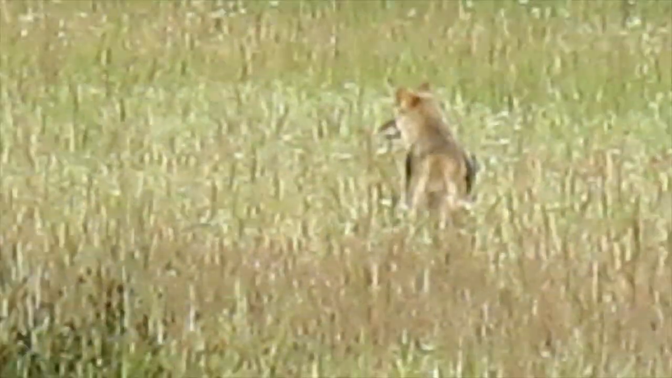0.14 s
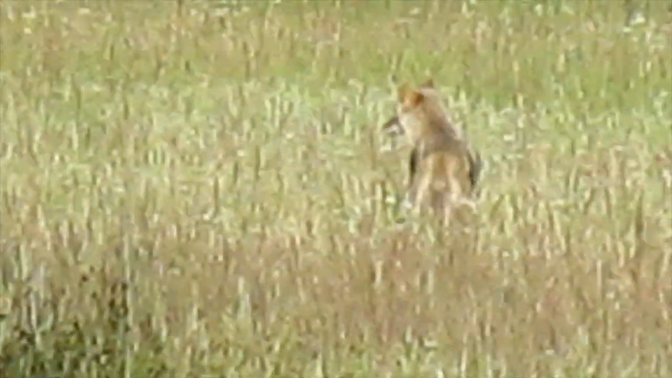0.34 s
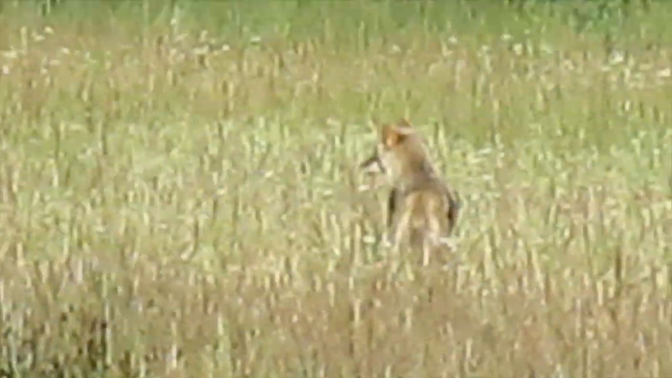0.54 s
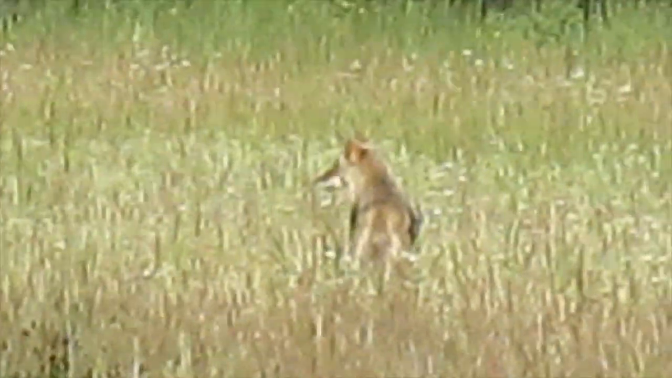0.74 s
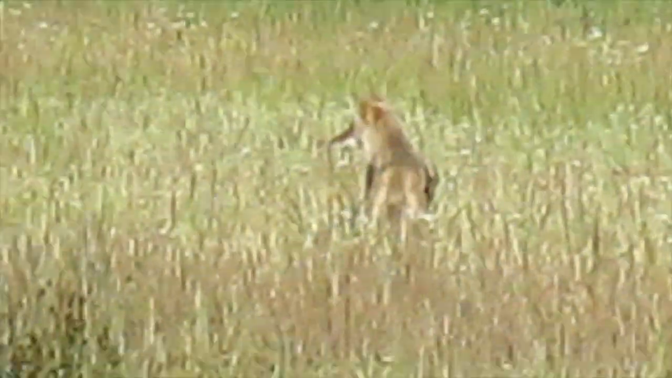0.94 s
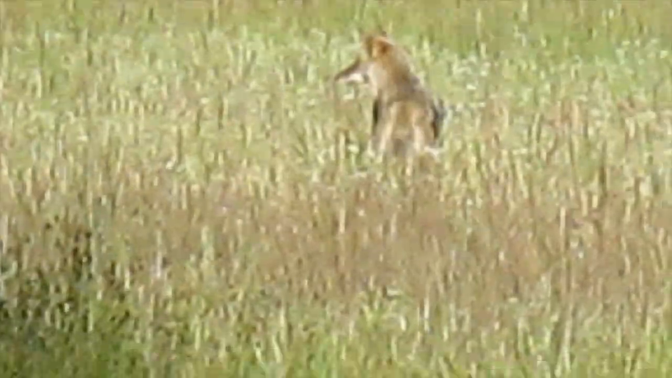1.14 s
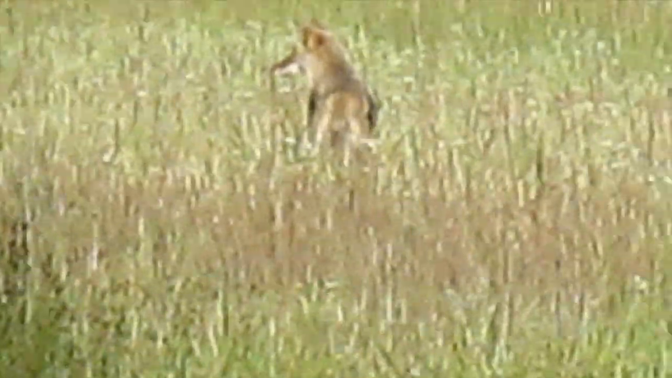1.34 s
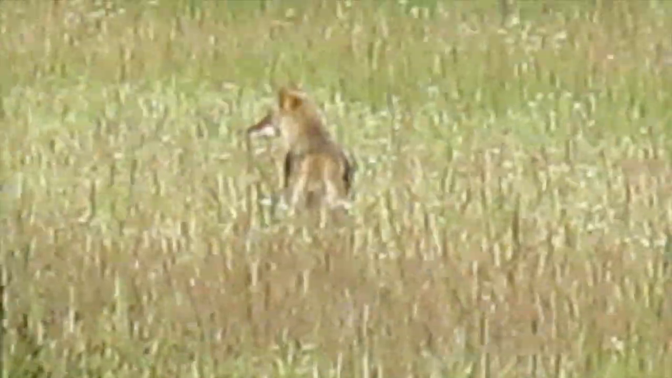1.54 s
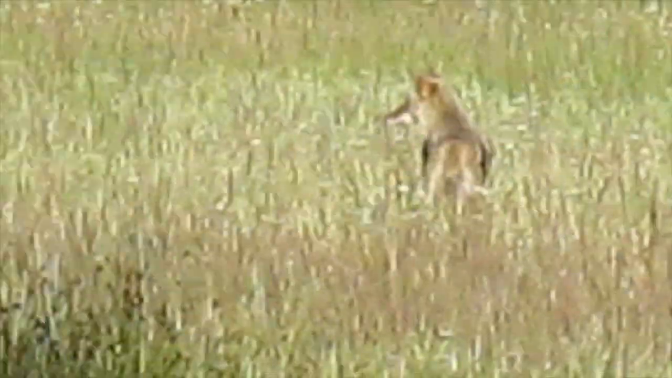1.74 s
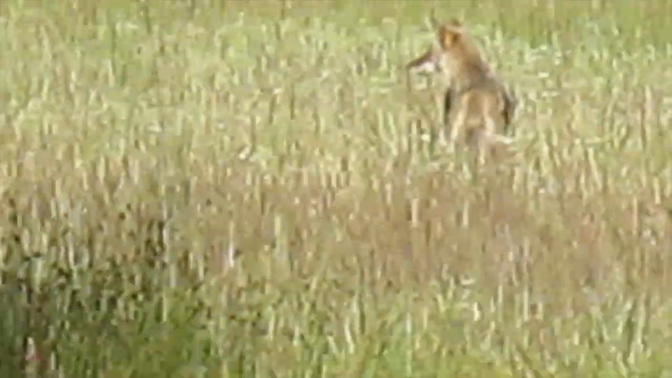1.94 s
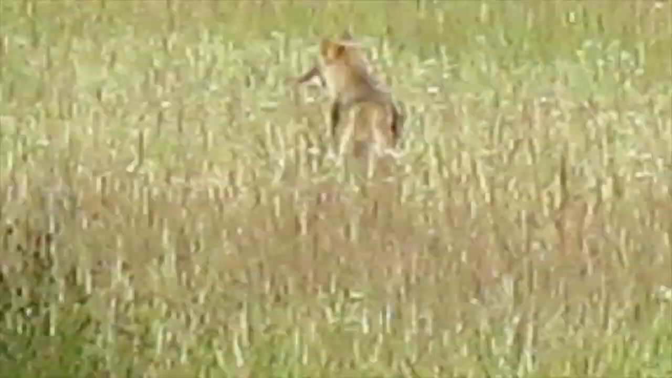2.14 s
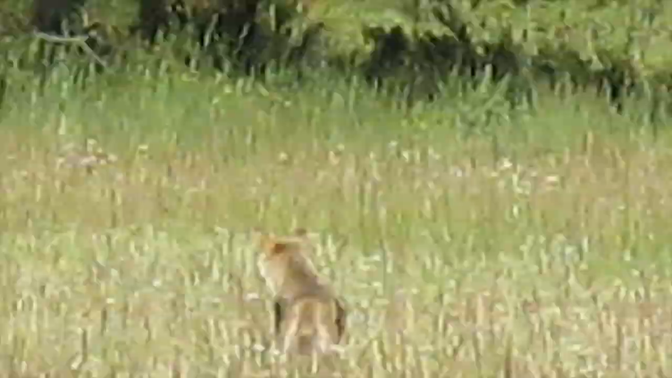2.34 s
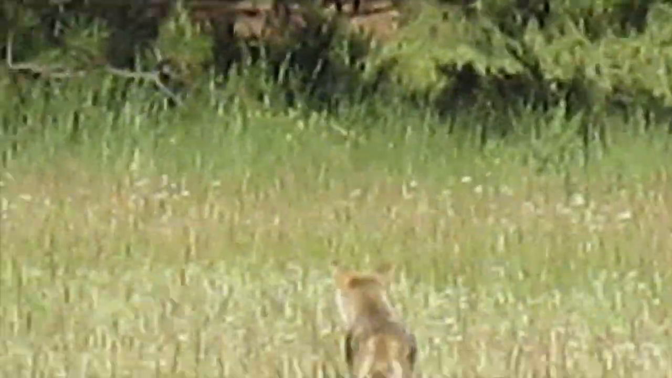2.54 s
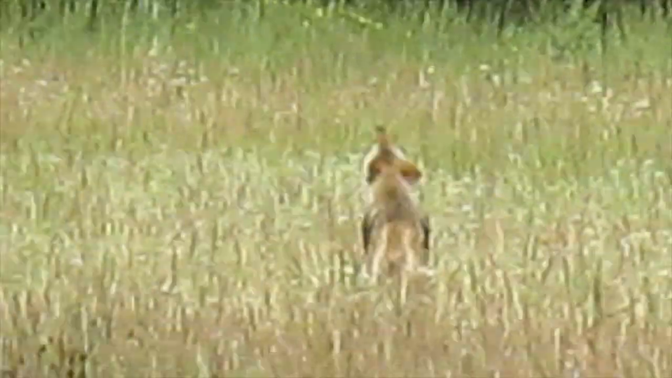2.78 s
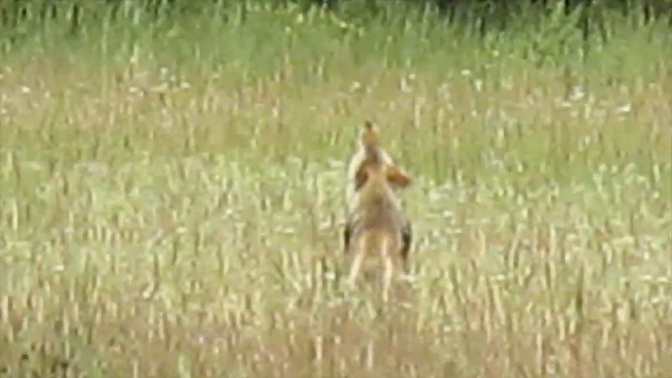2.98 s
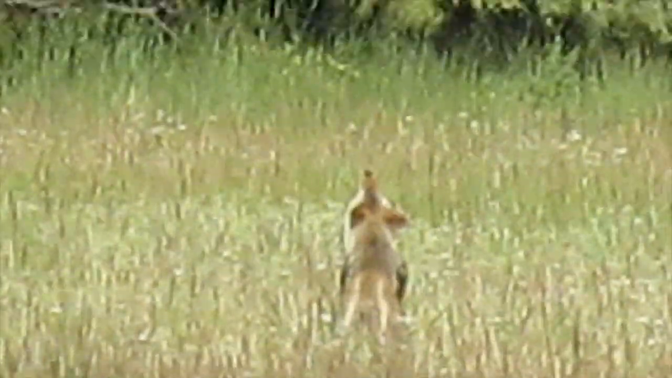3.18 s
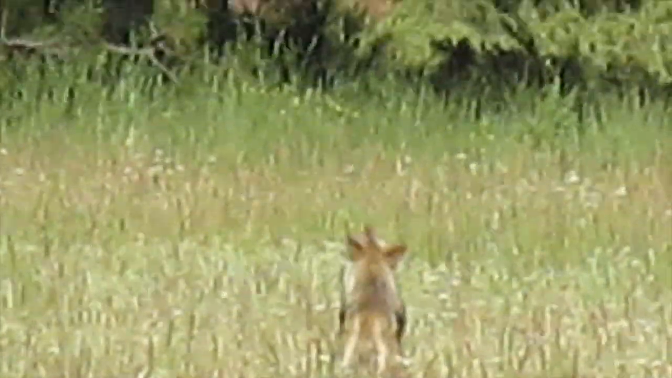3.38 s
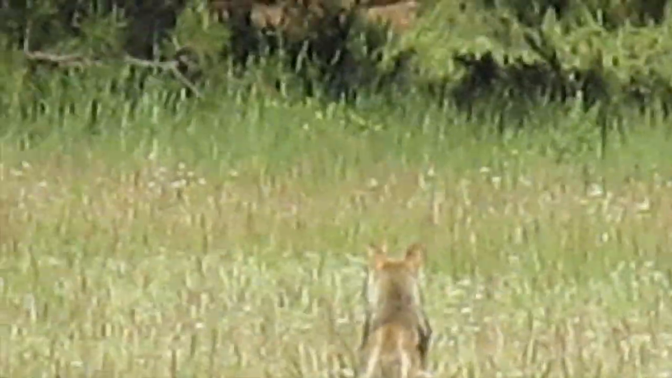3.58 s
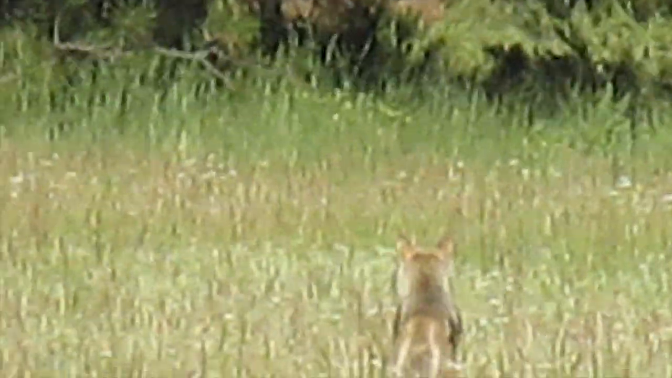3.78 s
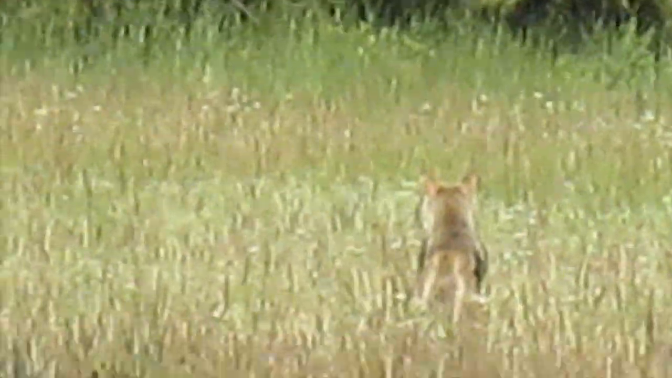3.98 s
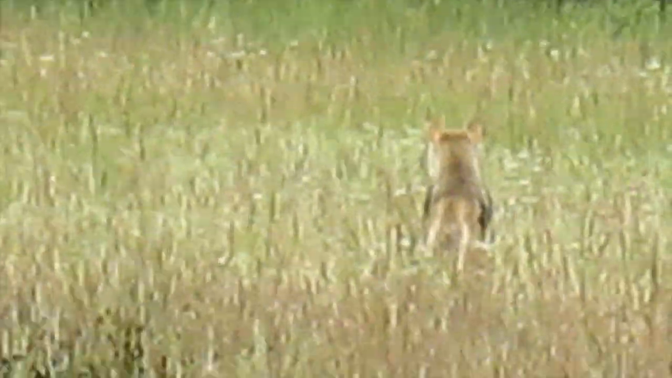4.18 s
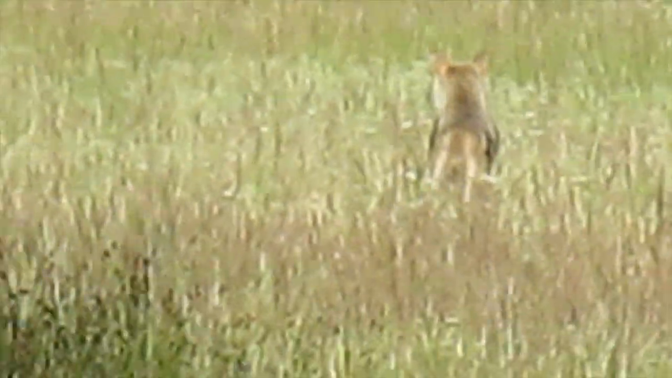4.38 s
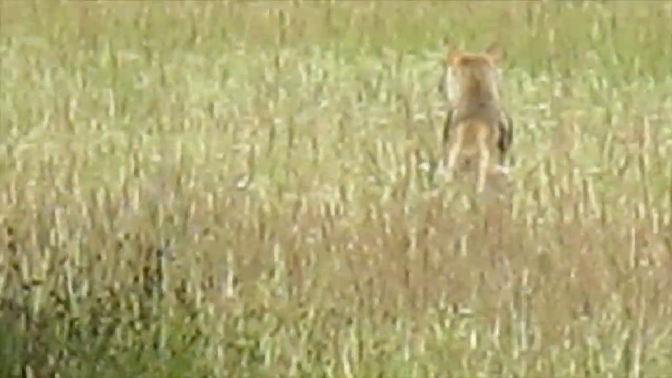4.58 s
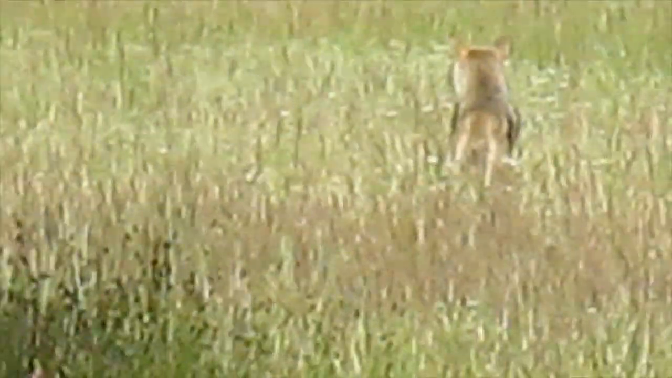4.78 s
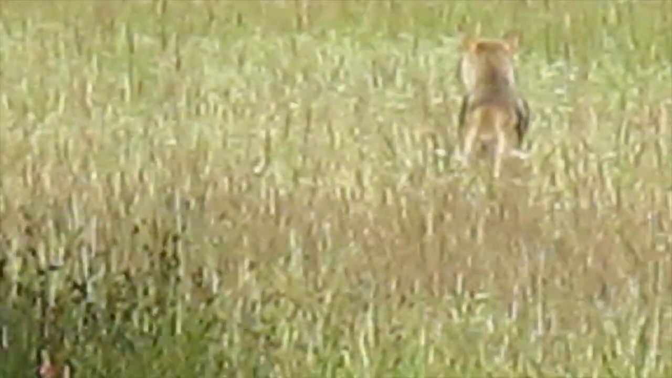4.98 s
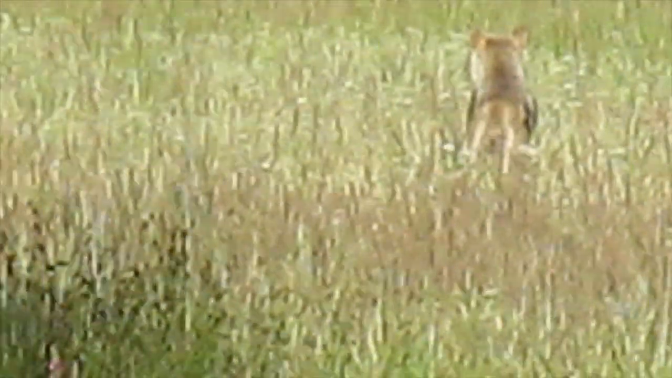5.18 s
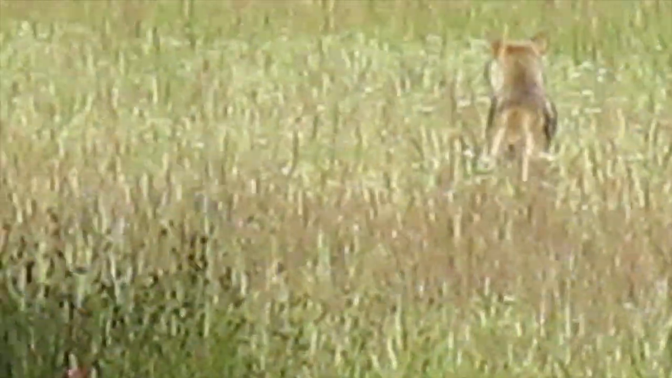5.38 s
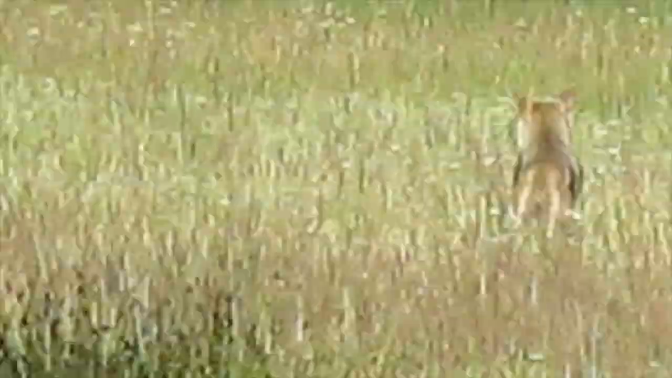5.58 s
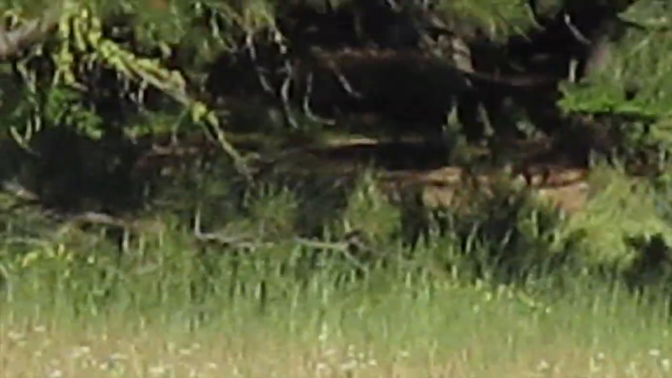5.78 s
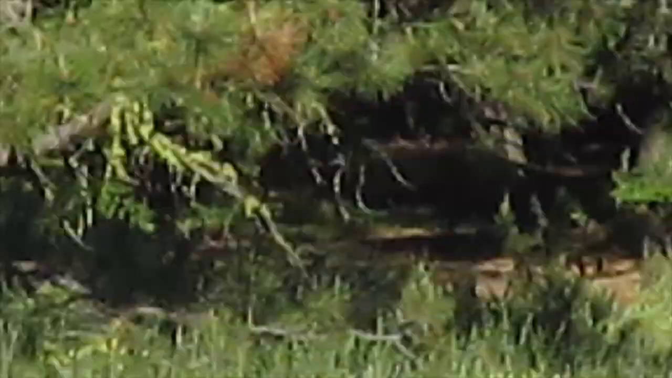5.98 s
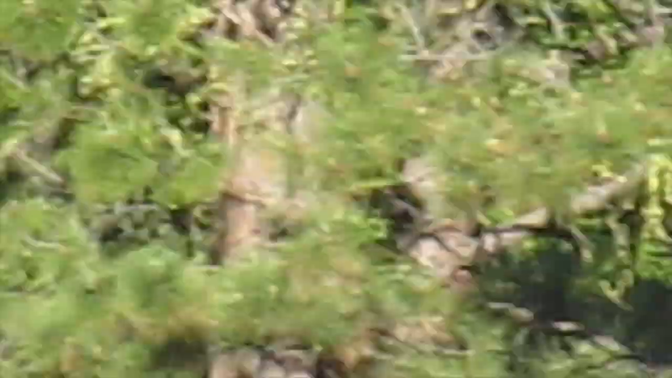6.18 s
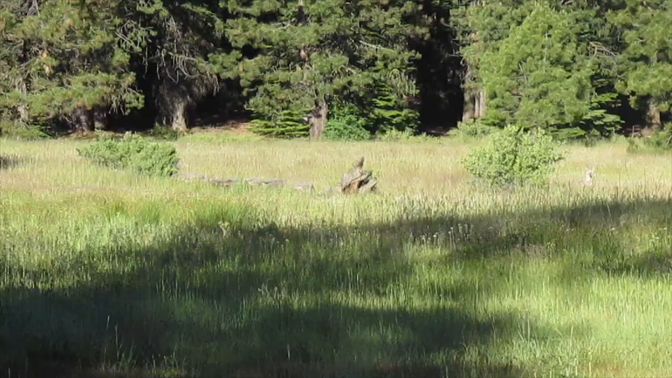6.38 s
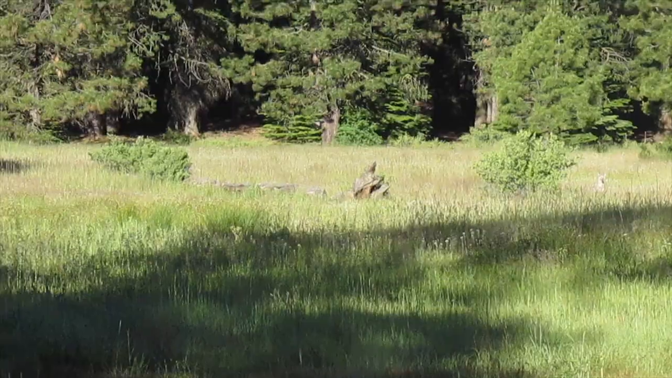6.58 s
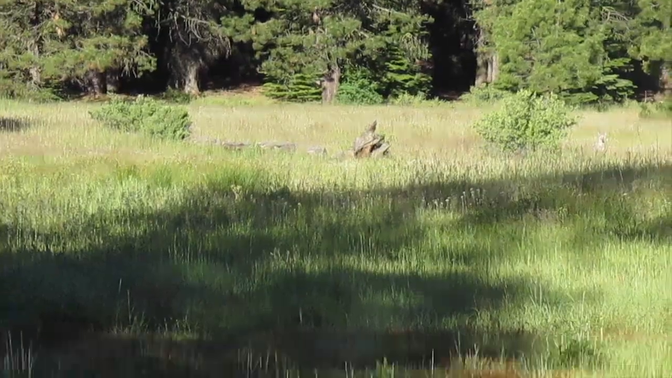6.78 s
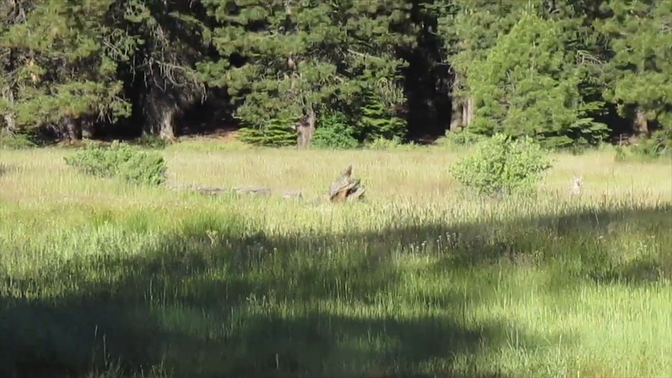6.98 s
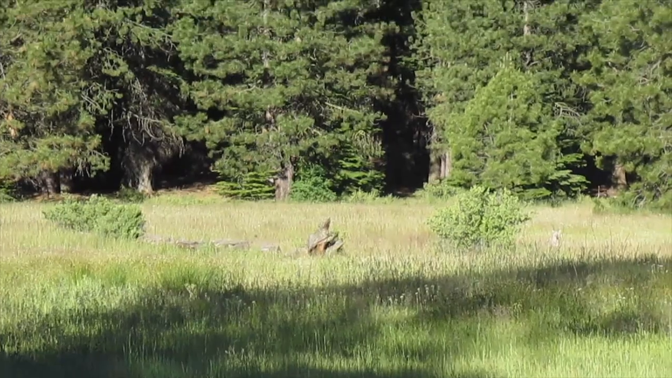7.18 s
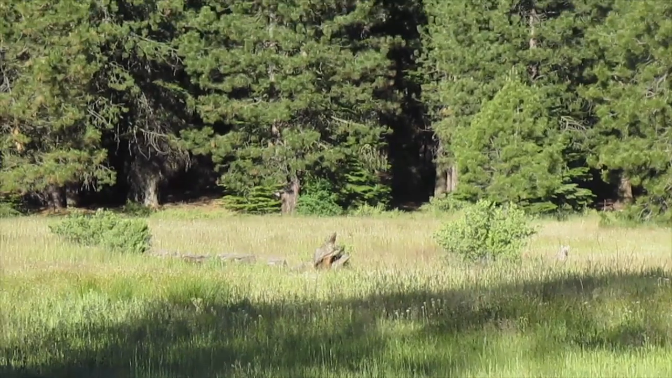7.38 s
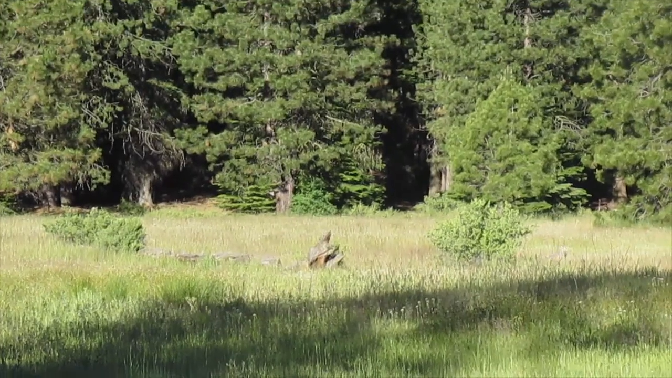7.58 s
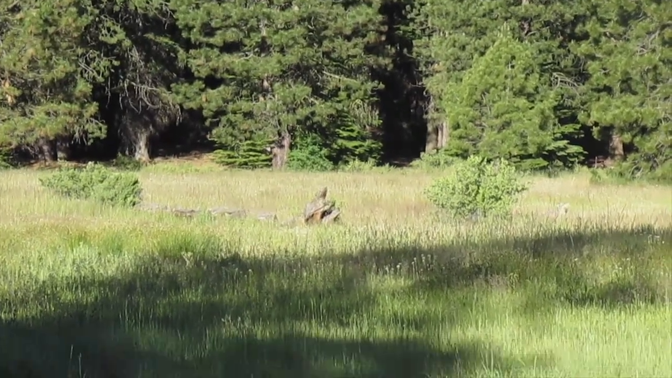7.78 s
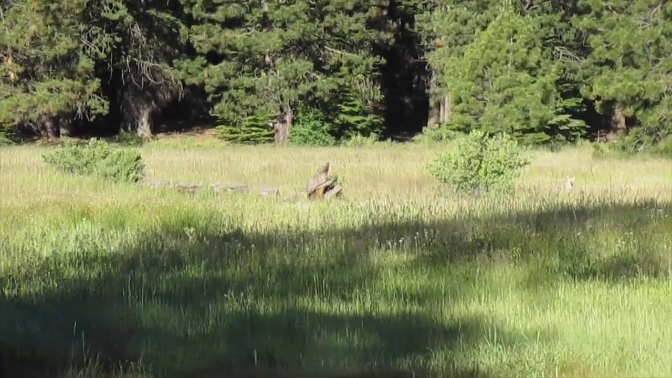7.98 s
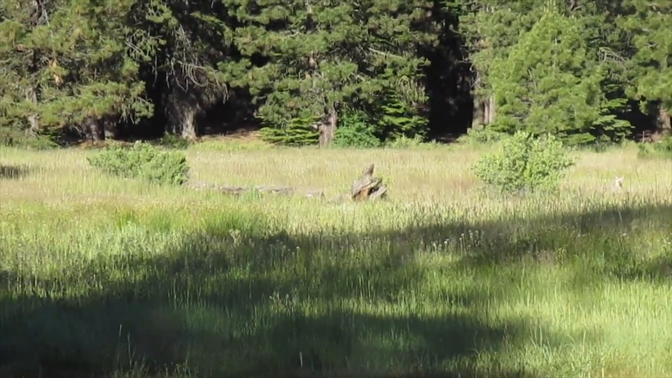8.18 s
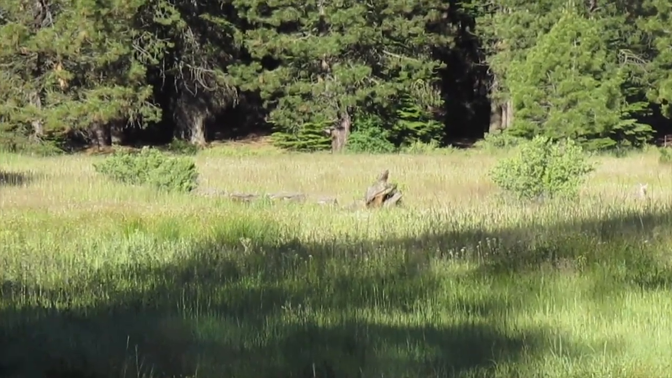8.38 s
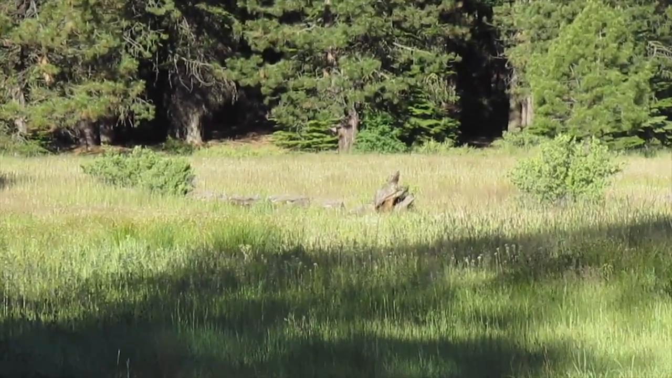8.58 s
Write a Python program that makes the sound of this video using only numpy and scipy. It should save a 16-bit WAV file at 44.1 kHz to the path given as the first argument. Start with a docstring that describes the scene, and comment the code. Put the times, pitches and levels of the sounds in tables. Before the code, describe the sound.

Soft breeze and microphone hiss fill a forest-edged meadow, with the fading echo of an earlier howl at the start. A bird gives short rising whistles about every half second, left of centre; rough two-toned chucks come from the left too. A series of thin arched chips runs on the right from 0.5 to about 1.9 seconds and again from 5.1. Warbling whistled phrases come between 2 and 4.8. At 3.0 a distant coyote scoops up, breaks into a high clear howl, sags, roughens slightly and drops by 3.8; its echo lingers for seconds. Tiny far pips follow. Fingers rub the camera near 5.5 and 5.7. Sound vanishes from 6.3 to 6.5, then returns quieter, without the echo, with faint whistles and sparse chucks, the breeze slowly rising. A light knock comes at 7.1, sharper knocks and rubbing from 8.2, and a cluster of taps with a rattling, buzzing zoom motor from 8.4 to the end.

```python
"""A coyote far out in a meadow howls, and the forest edge rings on for seconds, as it still does at the
start from an earlier howl. Nearby birds whistle, chip, chuck and sing; their notes are sines along drawn
curves. Behind them lie breeze and microphone hiss, made of shaped random noise, and faint steady tones.
The sound is cut, goes silent briefly and fades up as a second scene. Fingers knock and rub the body of a
hand-held camera and start its zoom motor: bursts, noise and gear clicks that ring through resonances."""
import sys
import numpy as np
from scipy import signal
from scipy.fft import rfft, irfft, next_fast_len
from scipy.io import wavfile
from scipy.ndimage import uniform_filter1d

SR = 44100
rng = np.random.default_rng(int(sys.argv[2]) if len(sys.argv) > 2 else 0)


def digitize_waveform(pressure):
    """Quantize a signal to 16-bit integers and store it at the path in sys.argv[1].

    Rows of a 2-D input are taken as channels; values are limited to [-1, 1].
    """
    field = np.atleast_2d(pressure).T
    bounded = np.clip(field, -1, 1)
    quanta = np.round(bounded * 32767).astype(np.int16)
    wavfile.write(sys.argv[1], SR, quanta)


N = 380566
TIME = np.arange(N) / SR
FFT_SIZE = next_fast_len(N)

# the silence between the two scenes: start t/s, end t/s
CUT_S = (6.318, 6.481)

# air noise colour: f/Hz, relative level/dB per Hz
AIR_COLOUR = [(12, -51), (20, -8), (74, -3), (171, -4.5), (220, -4), (353, -3.5), (792, -8), (1110, -6.5),
              (1420, -8.5), (1590, -10), (2410, -13), (4210, -13), (5720, -16), (6580, -15.5), (15600, -17)]
AIR_DB = -62.5  # overall, before the left-right spread and the swells
# how alike left and right air noise are: f/Hz, correlation (-1 to 1)
AIR_LIKENESS = [(60, -0.58), (130, -0.65), (290, -0.42), (640, 0.15), (1410, 0.06), (3100, -0.17),
                (6820, 0.06), (15000, 0.05)]
# tilt of the air noise between the ears: f/Hz, left minus right level/dB
AIR_LEAN = [(60, 0.5), (110, -1), (200, 1), (380, 1), (700, -0.5), (1290, 1), (2380, -1.0), (4400, 0),
            (8120, 1.5), (15000, -1)]
# slow background swell, lower after the cut and creeping back: t/s, level/dB, extra low wind level/dB
BACKGROUND_SWELL = [(0, -0.5, 0.5), (2, -0.5, 0.5), (4, -0.5, -0.5), (6.3, 0, 1.5), (6.479, -4.5, -3),
                    (6.8, -5.5, 0.5), (7.101, -3.5, -1.5), (7.4, -3, 0), (7.6, -2, 5.5), (7.9, 1, -2),
                    (8.201, 1, 2.5), (8.63, 0, -1)]
# short dips of the background: start t/s, end t/s, level/dB
BACKGROUND_DIPS = [(8.2, 8.205, -3), (8.402, 8.428, -10), (8.465, 8.47, -4)]
# faint steady tones: the highest from the camera electronics, those near 3.1 kHz probably far bird whistles
# columns: f/Hz, level/dB, start t/s, end t/s
STEADY_TONES = [(15734, -92, 0, 9), (6320, -84, 7.5, 8.2), (3170, -76, 6.48, 6.57), (3200, -80, 7.66, 7.75),
                (3080, -78, 7.76, 8.1)]
TONE_FLICKER_DB = 3

# echo by band: f/Hz, far trees' time to fall 60 dB t/s, their level/dB, near trees' time t/s, their level/dB
FOREST_BANDS = [(500, 7.0, 3.5, 0.81, -12.5), (975, 6.0, 2.5, 0.65, -1), (1500, 3.8, -2.5, 0.18, -7),
                (2500, 4.2, -7.5, 0.24, 2), (4000, 1.2, -16, 0.25, -5), (7000, 0.92, -16, 0.74, -1)]
# bunched echoes off walls of trees: delay t/s, spread t/s, level/dB
TREE_WALLS = [(.13, 0.034, -13), (.3, .05, -23)]
FAR_RISE_S, ECHO_PAN_DB = 0.34, 3  # the far slope lies to the left
PATCHY_DB = 3  # slopes and gaps make the long echo uneven
ECHO_SHARED = .1  # part of the echo that both ears hear alike, 0-1
# the earlier howl, heard only as echo: start t/s, relative level/dB
EARLIER_HOWL = (-1.6, -19.5)

# placing of each voice, by name: left minus right level/dB
VOICE_PAN = {"howl": -2, "whistle": -7, "chip": 8, "chuck": -6.5, "song": .1, "pip": 2}

# Note shapes: t/s from the note's time, f/Hz before any pitch scaling, level/dB added to the note's level
# rising whistle
WHISTLE_RISE = [(-.038, 1970, -22), (-.025, 2150, -9.5), (-.01, 2330, -3.5), (0, 2450, -6),
                (.008, 2530, -3.5), (.016, 2500, -23)]
# thin tick that opens the rising whistle
WHISTLE_TICK = [(-.028, 8400, -25), (-.022, 8750, -9), (-.014, 9000, -16.5), (-.01, 9000, -30)]
# weak octave of the rising whistle
WHISTLE_OCTAVE = [(-.032, 4150, -29), (-.024, 4300, -13.5), (-.012, 4400, -17.5), (.005, 4900, -20),
                  (.012, 5050, -33)]
# arched chip
CHIP_ARCH = [(-.03, 4900, -13), (-.018, 5405, -6), (0, 5785, 2.5), (.01, 5850, -8.5), (.022, 5500, -9),
             (.04, 4434, -4), (.046, 4230, -27)]
# lower voice of a chuck
CHUCK_LOWER = [(-.028, 1245, -23), (-.021, 1480, -5), (-.006, 1570, 0.5), (.004, 1500, -0.5),
               (.014, 1250, -2.5), (.026, 1050, -19.5)]
# upper voice of a chuck
CHUCK_UPPER = [(-.024, 2500, -28), (-.017, 2899, -10.5), (0, 2247, -6.5), (.015, 1650, -8.5),
               (.028, 1350, -26)]
# clean up-and-down flick before some song phrases
FLICK_SHAPE = [(-.008, 3200, -4), (0, 3750, 0), (.012, 3130, -3)]
# pip of a far bird
PIP_SHAPE = [(-.022, 4270, -13), (-.01, 4700, -0.5), (0, 4800, -3.5), (.012, 4500, -2), (.024, 4150, -18)]
# longer, level whistle of the far bird
HELD_SHAPE = [(0, 4080, -12), (.02, 4150, -3), (.05, 4280, 0), (.075, 4220, -2), (.09, 4200, -15)]

# rising whistles: t/s
WHISTLE_TIMES = [.218, .693, 1.226, 1.711, 2.231, 2.759, 3.18, 3.648, 4.16, 4.648, 5.182, 5.671, 6.128,
                 6.536, 6.939, 7.348, 7.727, 8.165]
WHISTLE_DB, WHISTLE_AFTER_CUT_DB = -57, -70
# chip series: first chip t/s, full level/dB
CHIP_SERIES = [(.485, -69), (5.11, -66.5)]
# number of chips in each series
CHIP_COUNTS = (12, 10)
CHIP_GAP_S, CHIP_SLOWING_S = .1221, .001  # starting gap, and its growth per chip
CHIP_START_DB, CHIP_SCATTER_DB = -9, 1.2
# two-voiced chucks: t/s, lower voice level/dB, pitch f/Hz, upper voice level/dB
CHUCK_CALLS = [(.515, -64, 1348, -65), (1.255, -60, 1413, -62), (1.486, -58, 1500, -61),
               (1.702, -58.5, 1672, -63), (1.931, -59, 1670, -62), (2.195, -60.5, 1584, -64),
               (5.11, -57, 1398, -59), (5.976, -58, 1500, -60), (6.263, -58, 1540, -60),
               (7.519, -71.5, 1367, -73), (7.784, -64.5, 1440, -69), (8.025, -62, 1518, -72),
               (8.252, -63, 1500, -66), (8.53, -66, 1463, -73)]

# phrases that warble, then slide clean: start t/s, slide t/s, end t/s,
# start f/Hz, f/Hz at the slide, end f/Hz, full level/dB, end level/dB
SONG_PHRASES = [(2.052, 2.092, 2.133, 3150, 3350, 2140, -63, -72),
                (2.16, 2.225, 2.24, 2650, 3000, 2900, -64, -66),
                (2.52, 2.578, 2.635, 3250, 3500, 2200, -60, -66),
                (2.638, 2.7, 2.742, 2950, 3050, 2630, -60, -66),
                (3.465, 3.525, 3.59, 3100, 3500, 2100, -56, -64),
                (3.605, 3.68, 3.72, 2850, 2850, 2700, -59, -68),
                (3.745, 3.76, 3.785, 2740, 2600, 1900, -63, -62),
                (4.0, 4.03, 4.068, 2800, 2840, 1900, -60, -57),
                (4.562, 4.612, 4.642, 3130, 3350, 2580, -59, -68),
                (4.668, 4.7, 4.715, 2800, 2750, 2950, -59, -61),
                (4.715, 4.735, 4.76, 3200, 3350, 3150, -59, -61),
                (4.765, 4.77, 4.81, 2650, 2700, 3000, -66, -68)]
# flicks: t/s, level/dB
SONG_FLICKS = [(2.508, -66), (4.553, -57)]
WARBLE_HZ, WARBLE_DEPTH_HZ, WARBLE_FADE_S = 72, 240, .025
SONG_START_DB, SLIDE_BEND, SLIDE_DIP_DB = -4, 1.6, -4

# howl: a scoop up, the break, a climb, a long sag and a final drop
# columns: t/s, vocal fold pulse rate f/Hz, level/dB before the throat
HOWL_CURVE = [(2.982, 460, -77), (3.005, 549, -52), (3.04, 732, -45), (3.043, 648, -37), (3.068, 655, -32),
              (3.11, 755, -36), (3.132, 792, -32.5), (3.2, 800, -33), (3.275, 792, -32), (3.33, 782, -35.5),
              (3.415, 724, -39), (3.47, 728, -40.5), (3.535, 708, -38.5), (3.61, 726, -41),
              (3.65, 696, -39.5), (3.755, 688, -42), (3.77, 410, -50), (3.782, 398, -51), (3.79, 396, -65)]
# how the throat favours some pitches: f/Hz, level/dB
THROAT = [(400, -6.5), (700, -3.5), (1000, -10), (1450, 1.5), (2000, -5), (3000, -25.5), (4000, -42),
          (5000, -63.5), (6500, -50)]
# odd overtones before the break, just after it, settled, in the drop: level/dB
ODD_OVERTONES = (2, -19, -37, -24)
# the odd overtones weaken when the voice breaks into the high register, so the heard pitch doubles
BREAK_S, SETTLED_S, DROP_S = 3.042, 3.1, 3.762
BRIGHT_DB, DULLING_DB_PER_S, DROP_DULL_DB = 1.5, -9, -7  # per overtone above the second
ROUGH, SCOOP_ROUGH, BREAK_ROUGH, DROP_ROUGH = .01, .15, .5, .2  # strength of the roughness
BREAK_CALMS_S, TIRING_ROUGH_PER_S = .018, .12

# faint pips of a far bird: t/s, level/dB, pitch f/Hz
PIP_CALLS = [(3.455, -69, 4000), (3.57, -67, 4500), (4.71, -72, 4650), (4.83, -71, 4600),
             (4.98, -67.5, 4800), (5.09, -72, 4730), (5.19, -69, 5480), (5.235, -69, 4688),
             (6.155, -71, 4800), (6.175, -67.5, 4300), (7.96, -71, 4980), (8.13, -70, 5130),
             (8.157, -70, 5000), (8.33, -73, 4880), (8.36, -71, 5000)]
# held whistles of the far bird: t/s, level/dB
HELD_CALLS = [(3.305, -64)]

# fingers rubbing the camera: start t/s, loudest t/s, end t/s, hiss level/dB, rumble level/dB
RUBS = [(5.514, 5.531, 5.555, -50.5, -49), (5.707, 5.731, 5.75, -53, -58), (7.085, 7.096, 7.14, -56, -56.5),
        (8.208, 8.266, 8.272, -46, -54), (8.422, 8.442, 8.44, -59, -45)]
# knocks on the camera body: t/s, thud level/dB, snap level/dB, before the body rings
KNOCKS = [(7.096, -53, -43), (8.19, -42.5, -43), (8.211, -54, -38), (8.217, -54, -40), (8.268, -44, -50),
          (8.418, -44, -60), (8.431, -48, -52), (8.436, -48, -52), (8.442, -40.5, -46), (8.455, -45, -40),
          (8.483, -50, -44), (8.493, -43, -43)]
# body resonances that ring in a thud: f/Hz, width f/Hz, level/dB
BODY_RING = [(132.5, 110, -3.5), (428, 124, -1.5), (966, 165, 4)]
# thin shell and buttons that ring in a snap: f/Hz, width f/Hz, level/dB
SHELL_RING = [(2500, 620, -10), (6360, 5600, 0), (10400, 4400, -1.5)]
# loud kicks of the zoom motor: t/s, level/dB added as amplitude to the running level
MOTOR_KICKS = [(8.431, -54), (8.483, -59)]
# gear resonance: f/Hz, width f/Hz, level/dB
GEAR_RING = [(2500, 400, 0)]
# motor rattle: f/Hz, width f/Hz, level/dB relative to the gear
RATTLE_RING = [(7750, 3600, -6), (12900, 2100, 0)]
MOTOR_HZ, MOTOR_WAVER = 151, .06  # gear steps per second; waver in steps
MOTOR_RUN_DB, MOTOR_SINK_S = -66, .014

# microphone notch: f/Hz, width f/Hz, depth (0-1)
MIC_NOTCH = (7590, 130, 0.6)
# broad weakening of the microphone near the top: f/Hz, width f/Hz, depth (0-1)
MIC_TOP = (14500, 2100, .3)
TOP_HZ = 15760


def amp(db):
    """Turn decibels into a plain multiplier."""
    return 10 ** (np.asarray(db, float) / 20)


def unit(x):
    """Scale a sound to an average (RMS) strength of 1."""
    return x / np.sqrt(np.mean(x ** 2))


def over_hz(table, hz, column=1):
    """Read a table column between its rows, straight on a log-frequency axis."""
    table = np.array(table, float)
    return np.interp(np.log(np.maximum(hz, 1)), np.log(table[:, 0]), table[:, column])


def ring(x, modes):
    """Let a sound excite several resonances (f/Hz, width f/Hz, level/dB) and add them up."""
    return sum(amp(db) * signal.lfilter(*signal.iirpeak(hz, hz / width, fs=SR), x)
               for hz, width, db in modes)


def walk(rate, size=N):
    """Random wandering curve with spread 1; a higher rate in Hz wanders faster."""
    k = max(int(SR / rate), 1)
    return unit(uniform_filter1d(uniform_filter1d(rng.standard_normal(size), k), k))


def place(x, pan_db):
    """Make a sound stereo by its left-minus-right level."""
    return x * amp([[pan_db / 2], [-pan_db / 2]])


def add(track, start, hz, db):
    """Add a sine that follows pitch and level curves from the start time on."""
    i = int(start * SR)
    tone = np.sqrt(2) * amp(db) * np.sin(2 * np.pi * np.cumsum(hz) / SR)
    track[i:i + len(hz)] += tone[:len(track) - i]


def notes(rows, shape, pitch_hz=None, rough=.1):
    """Sing one note shape at every row, a little different each time; roughness shakes pitch and level."""
    track = np.zeros(N)
    s, hz, db = np.transpose(shape)
    t = np.arange(s[0], s[-1], 1 / SR)
    for row in rows:
        scale = row[2] / pitch_hz if pitch_hz else 1 + .008 * rng.standard_normal()
        scale = scale * (1 + 0.043 * rough * walk(300, size=len(t)))
        level_db = row[1] + np.interp(t, s, db) + 6 * rough * walk(220, size=len(t))
        add(track, row[0] + s[0], scale * np.interp(t, s, hz), level_db)
    return track


def air():
    """Breeze, microphone hiss and faint steady tones; the bass is partly opposed between the two ports."""
    hz = np.fft.rfftfreq(FFT_SIZE, 1 / SR)
    like = np.clip(over_hz(AIR_LIKENESS, hz), -.95, .95)
    mid, side = rfft(rng.standard_normal((2, FFT_SIZE))) * amp(over_hz(AIR_COLOUR, hz))
    side = side * np.sqrt((1 - like) / (1 + like))
    lean = amp(over_hz(AIR_LEAN, hz) / 2)
    both = np.array([(mid + side) * lean, (mid - side) / lean])
    both = both * amp(AIR_DB) / np.std(irfft(mid, FFT_SIZE))
    # split at about 600 Hz: the low wind swells on its own
    low = 1 / (1 + (hz / 600) ** 4)
    s, db, wind_db = np.transpose(BACKGROUND_SWELL)
    wind = irfft(both * low, FFT_SIZE)[:, :N] * amp(np.interp(TIME, s, wind_db) + 1.0 * walk(5))
    rest = irfft(both * (1 - low), FFT_SIZE)[:, :N] * amp(.5 * walk(15))
    tone = np.zeros(N)
    for f, level_db, start, end in STEADY_TONES:
        level = np.sqrt(2) * amp(level_db + TONE_FLICKER_DB * walk(12))
        tone += level * np.sin(2 * np.pi * f * TIME) * (TIME > start) * (TIME < end)
    dips = sum(depth * (TIME > start) * (TIME < end) for start, end, depth in BACKGROUND_DIPS)
    smooth_dips = amp(uniform_filter1d(1. * dips, size=60))
    return ((wind + rest) * amp(np.interp(TIME, s, db)) + tone) * smooth_dips


def forest():
    """Echo pattern for each ear: bands of scatter, quick from near trunks, late and long from far slopes."""
    hz, out = np.fft.rfftfreq(FFT_SIZE, 1 / SR), np.zeros((2, N))
    noise = rfft(rng.standard_normal((3, FFT_SIZE)))
    noise = np.sqrt(1 - ECHO_SHARED) * noise[:2] + np.sqrt(ECHO_SHARED) * noise[2]
    patches = amp(PATCHY_DB * walk(7))
    walls = sum(amp(db) * np.exp(-.5 * ((TIME - s) / spread) ** 2) / np.sqrt(spread * SR)
                for s, spread, db in TREE_WALLS)
    for centre, far_t60, far_db, near_t60, near_db in FOREST_BANDS:
        # each band fades into its neighbours
        band_gain = over_hz([(row[0], row[0] == centre) for row in FOREST_BANDS], hz)
        band = irfft(noise * band_gain, FFT_SIZE)[:, :N]
        far = (1 - np.exp(-TIME / FAR_RISE_S)) * amp(-60 * TIME / far_t60) * patches
        far = amp(far_db) * far / np.linalg.norm(far)
        near = np.clip(TIME / 0.0025, 0, 1) * amp(-60 * TIME / near_t60)
        near = amp(near_db) * (near / np.linalg.norm(near) + walls)
        out += band * (place(far, ECHO_PAN_DB) + near)
    return out


def echo(x, response):
    """Let every instant of a sound set off the whole echo pattern (convolution)."""
    return signal.fftconvolve(x[None], response, axes=1)


def whistles():
    """Rising bird whistles: a gliding sine, a thin opening tick and a weak octave."""
    rows = [(s, WHISTLE_DB if s < CUT_S[0] else WHISTLE_AFTER_CUT_DB) for s in WHISTLE_TIMES]
    return sum(notes(rows, shape, rough=.15) for shape in (WHISTLE_RISE, WHISTLE_TICK, WHISTLE_OCTAVE))


def chips():
    """Chips whose pitch arches up and down, in series that start soft and slow down."""
    rows = []
    for (first, db), count in zip(CHIP_SERIES, CHIP_COUNTS):
        k = np.arange(count)
        times = first + CHIP_GAP_S * k + CHIP_SLOWING_S * k ** 2 / 2
        levels = db + CHIP_START_DB * np.exp(-k) + CHIP_SCATTER_DB * rng.standard_normal(count)
        rows += zip(times, levels)
    return notes(rows, CHIP_ARCH, rough=.25)


def chucks():
    """Rough chucks: two gliding voices sound together."""
    upper_rows = [(s, upper_db, hz) for s, db, hz, upper_db in CHUCK_CALLS]
    lower = notes(CHUCK_CALLS, CHUCK_LOWER, pitch_hz=1500, rough=0.75)
    return lower + notes(upper_rows, CHUCK_UPPER, pitch_hz=1520, rough=.9)


def song():
    """A whistled song whose pitch and level tremble with an uneven warble, then slide clean."""
    track = notes(SONG_FLICKS, FLICK_SHAPE)
    for start, slide, end, start_hz, slide_hz, end_hz, full_db, end_db in SONG_PHRASES:
        t = np.arange(start, end, 1 / SR)
        fall = np.interp(t, [slide, end], [0, 1])  # progress of the slide
        hz = np.interp(t, [start, slide], [start_hz, slide_hz])
        hz = hz + (end_hz - slide_hz) * (1 - (1 - fall) ** SLIDE_BEND)
        db = np.interp(t, [start, (start + slide) / 2, slide, end],
                       [full_db + SONG_START_DB, full_db, full_db, end_db])
        db = db + SLIDE_DIP_DB * np.sin(np.pi * fall)
        depth = WARBLE_DEPTH_HZ * np.clip((slide + WARBLE_FADE_S / 2 - t) / WARBLE_FADE_S, 0, 1)
        warble_hz = WARBLE_HZ * (1 + .2 * walk(60, size=len(t)))
        beat = 2 * np.pi * (np.cumsum(warble_hz) / SR + rng.random())
        # 6 ms fades at both ends
        edge = 20 * np.log10(np.clip(np.minimum(t - start, end - t) / .006, .001, 1))
        db = db + edge + depth / 70 * np.cos(beat) + 2.0 * walk(150, size=len(t))
        add(track, start, hz + depth * np.sin(beat), db)
    return track


def howl():
    """Overtones of the vocal folds, weighted by the throat; roughness shakes pitch and level."""
    s, *columns = np.transpose(HOWL_CURVE)
    t = np.arange(s[0], s[-1], 1 / SR)
    hz, db = (np.interp(t, s, c) for c in columns)
    stage = np.searchsorted([BREAK_S, SETTLED_S, DROP_S], t)
    odd_db = uniform_filter1d(np.array(ODD_OVERTONES, float)[stage], size=200)
    bright_db = BRIGHT_DB + DULLING_DB_PER_S * np.maximum(t - SETTLED_S, 0) + DROP_DULL_DB * (t > DROP_S)
    break_rough = BREAK_ROUGH * np.exp(-np.abs(t - BREAK_S) / BREAK_CALMS_S)
    later_rough = ROUGH + TIRING_ROUGH_PER_S * (t - BREAK_S) + break_rough
    rough = np.where(t < BREAK_S, SCOOP_ROUGH, later_rough) + DROP_ROUGH * (t > DROP_S)
    hz = hz * (1 + 0.0032 * walk(25, size=len(t)) + .12 * rough * walk(510, size=len(t)))
    db = db + 1.2 * walk(34, size=len(t)) + 8 * rough * walk(300, size=len(t))
    track = np.zeros(N)
    for k in range(1, 9):
        overtone_db = db + over_hz(THROAT, k * hz) + k % 2 * odd_db + max(k - 2, 0) * bright_db
        add(track, s[0], k * hz, overtone_db)
    # a rough voice locks every third cycle of the high register and grows side tones
    i = int(s[0] * SR)
    track[i:i + len(t)] *= 1 + 4 * rough ** 2 * np.cos(2 * np.pi * np.cumsum(hz * 2 / 3) / SR)
    return track


def pips():
    """A far bird's short pips and a longer, level whistle, as gliding sines."""
    short = notes(PIP_CALLS, PIP_SHAPE, pitch_hz=4800, rough=0.4)
    return short + notes(HELD_CALLS, HELD_SHAPE, rough=.3)


def rubs():
    """Fingers rubbing the camera: friction hiss and a low rumble that rise and fall together."""
    hiss = ring(rng.standard_normal((2, N)), [(4500, 2800, 0), (9000, 2800, 3), (12800, 2100, -7)])
    hiss = unit(hiss) * amp(2.5 * walk(430))
    rumble = unit(ring(rng.standard_normal((2, N)), [(89, 100, 4), (400, 890, -11.5), (1100, 600, -11.5)]))
    return sum(np.interp(TIME, row[:3], [0, 1, 0]) * (amp(row[3]) * hiss + amp(row[4]) * rumble)
               for row in RUBS)


def knocks():
    """Knocks on the camera: a soft push rings the body, a noise burst rings the shell and buttons."""
    thud, snap = np.zeros(N), np.zeros((2, N))
    bursts = rng.standard_normal((len(KNOCKS), 2, 200))
    for (s, db, snap_db), burst in zip(KNOCKS, bursts):
        i = int(s * SR)
        thud[i:i + 24] += amp(db + 9) * np.hanning(24)
        snap[:, i:i + 200] += amp(snap_db) * burst * np.exp(-np.arange(200) / (0.0013 * SR))
    return ring(thud, BODY_RING) + ring(snap, SHELL_RING)


def zoom_motor():
    """Each gear step is a click that rings narrow, followed by a short rattle; loud kicks sink away."""
    phase = (MOTOR_HZ * (TIME - MOTOR_KICKS[0][0]) + MOTOR_WAVER * walk(60)) % 1
    rattle_noise = np.exp(-phase / .45) * rng.standard_normal((2, N))
    clicks = (np.diff(phase, prepend=0) < -.5) * amp(1.5 * rng.standard_normal(N))
    gear = unit(ring(ring(clicks, GEAR_RING), GEAR_RING))
    rattle = np.zeros((2, N))
    for hz, width, db in RATTLE_RING:
        mode = [(hz, width, 0)]
        rattle += amp(db) * unit(ring(ring(rattle_noise, mode), mode))
    kicks = sum(amp(db) * np.exp(-np.abs(TIME - s) / MOTOR_SINK_S) * (TIME > s - .003)
                for s, db in MOTOR_KICKS)
    running = TIME > MOTOR_KICKS[0][0] - .003
    return (gear + rattle) * (amp(MOTOR_RUN_DB) + kicks) * running


def scene():
    """Add the voices, their echoes, the air and the camera noises."""
    call, response = howl(), forest()
    voices = {"howl": call, "whistle": whistles(), "chuck": chucks(), "chip": chips(),
              "song": song(), "pip": pips()}
    direct = sum(place(x, VOICE_PAN[name]) for name, x in voices.items())
    # echoes do not carry across the cut
    first = TIME < CUT_S[1]
    total = sum(voices.values())
    echoes = echo(total * first, response)[:, :N] * first + echo(total * ~first, response)[:, :N]
    # the earlier howl is the same call shifted back in time
    skip = int((HOWL_CURVE[0][0] - EARLIER_HOWL[0]) * SR)
    earlier = amp(EARLIER_HOWL[1]) * echo(call, response)[:, skip:skip + N] * first
    return direct + echoes + earlier + air() + knocks() + rubs() + zoom_motor()


def record(dry):
    """Microphone notch and soft top, the silent cut with quick fades, and a steep low-pass."""
    heard = dry
    for hz, width, depth in (MIC_NOTCH, MIC_TOP):
        heard = heard - depth * ring(heard, [(hz, width, 0)])
    fade_out, fade_in = (CUT_S[0] - TIME) / 0.0052, (TIME - CUT_S[1]) / 0.0028
    cut_gain = np.clip(np.maximum(fade_out, fade_in), 0, 1)
    low_pass = signal.ellip(14, .2, 90, TOP_HZ, fs=SR, output="sos")
    return signal.sosfilt(low_pass, heard * cut_gain)


dry = scene()
out = record(dry)
digitize_waveform(out)
```